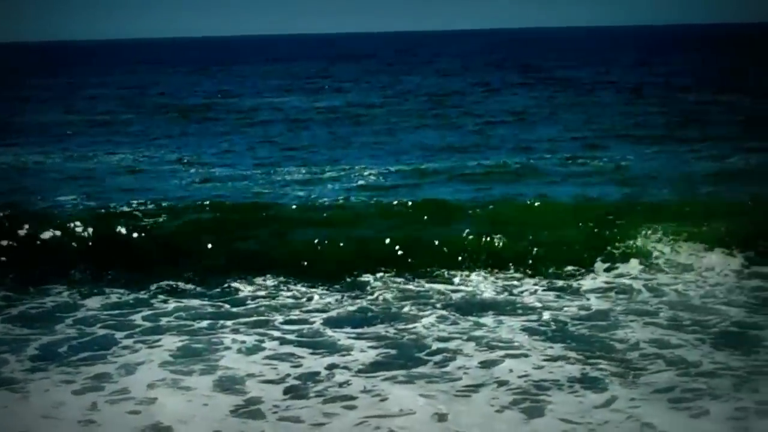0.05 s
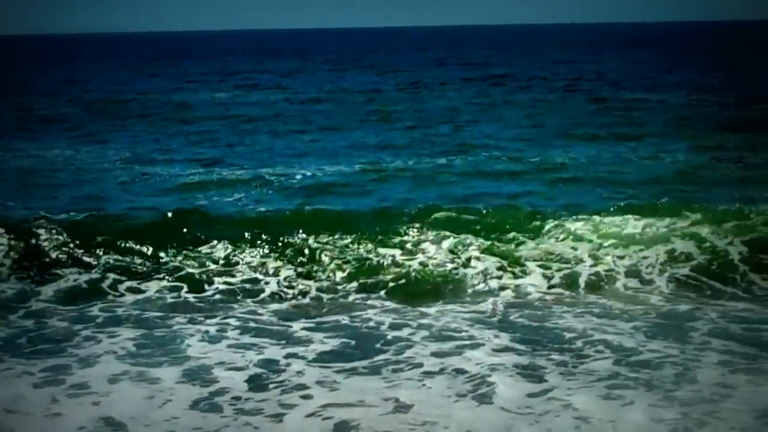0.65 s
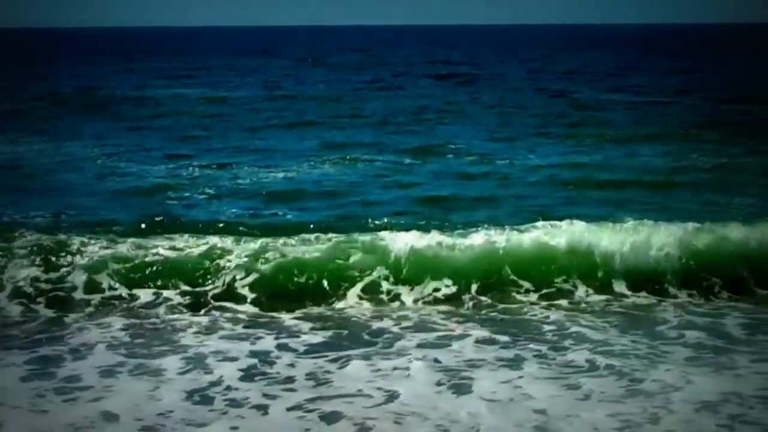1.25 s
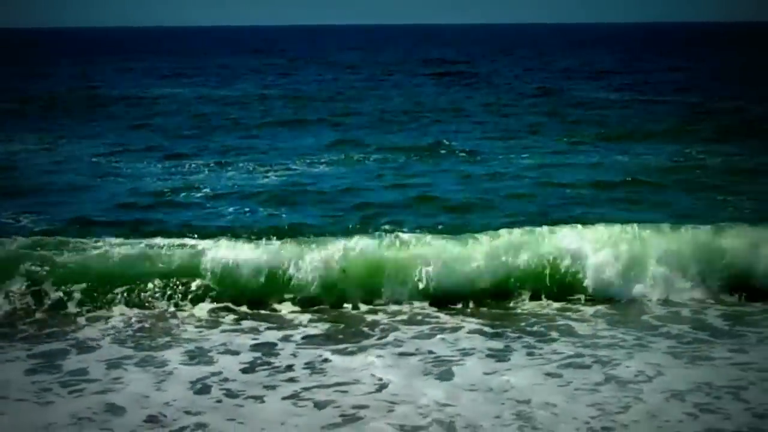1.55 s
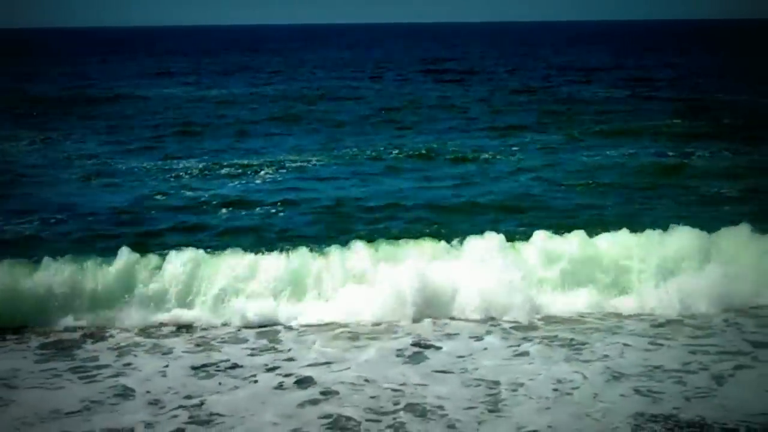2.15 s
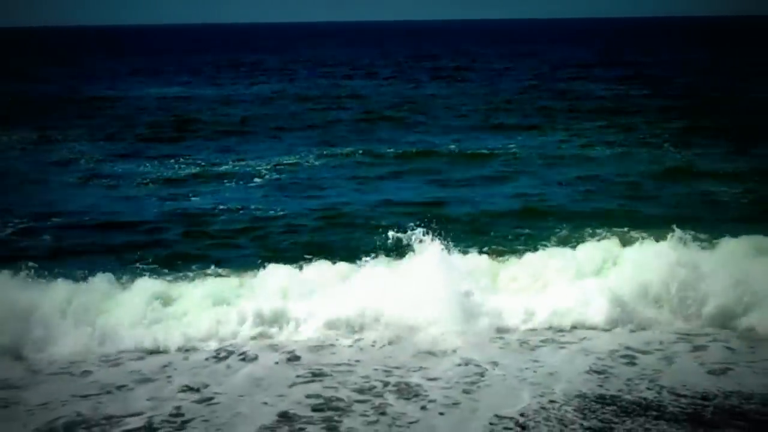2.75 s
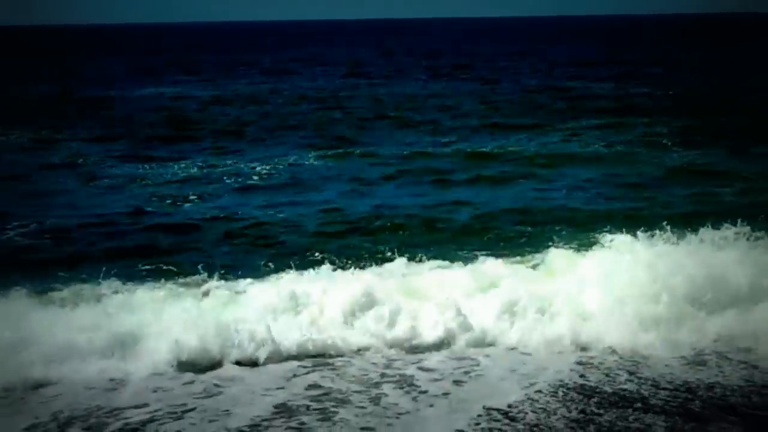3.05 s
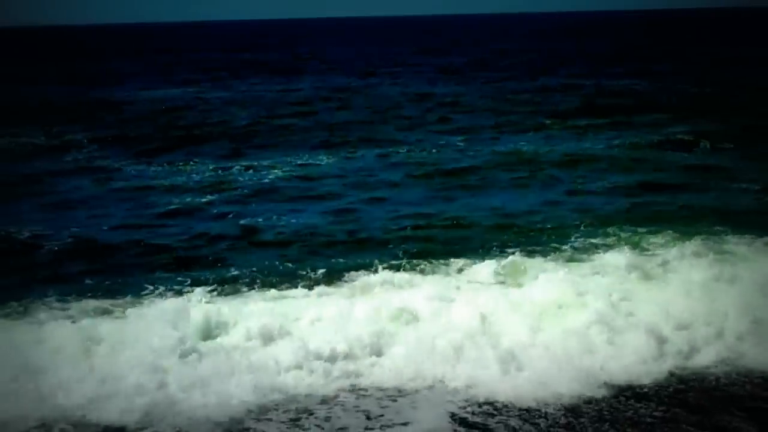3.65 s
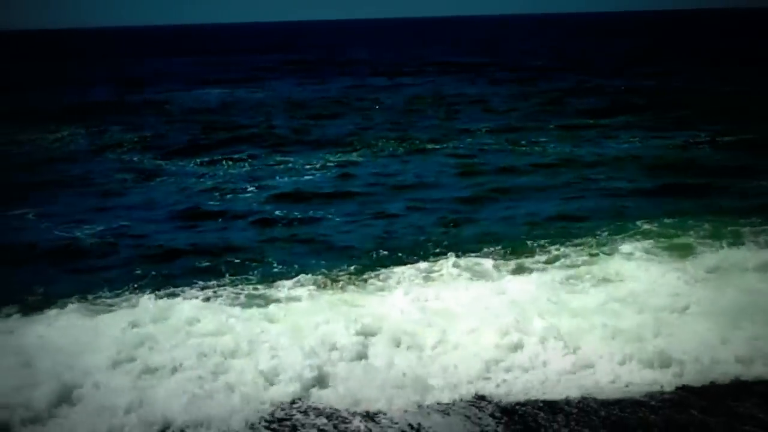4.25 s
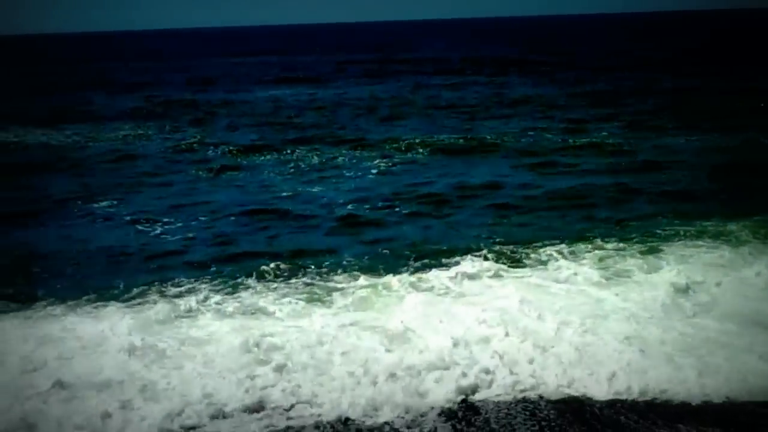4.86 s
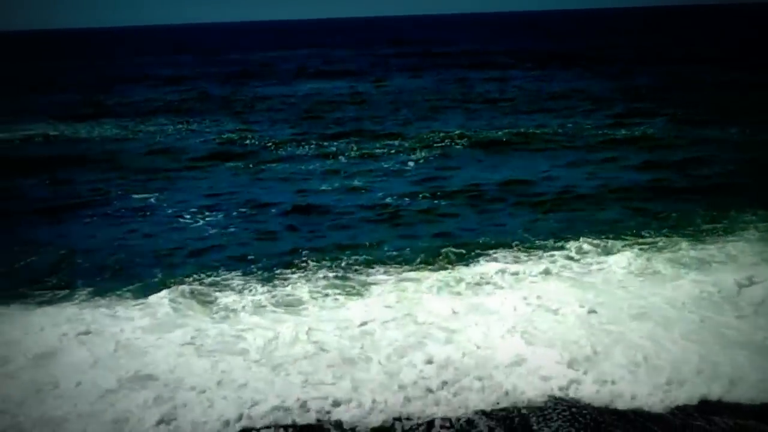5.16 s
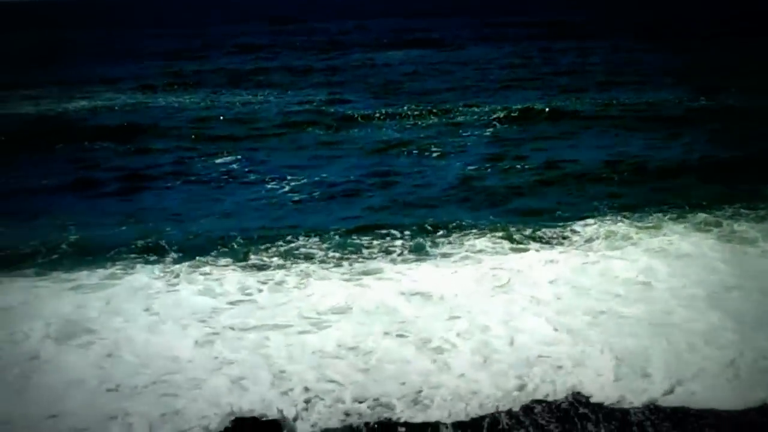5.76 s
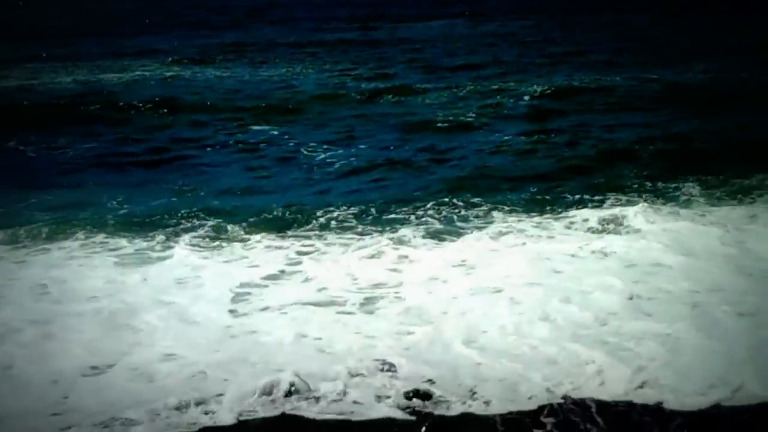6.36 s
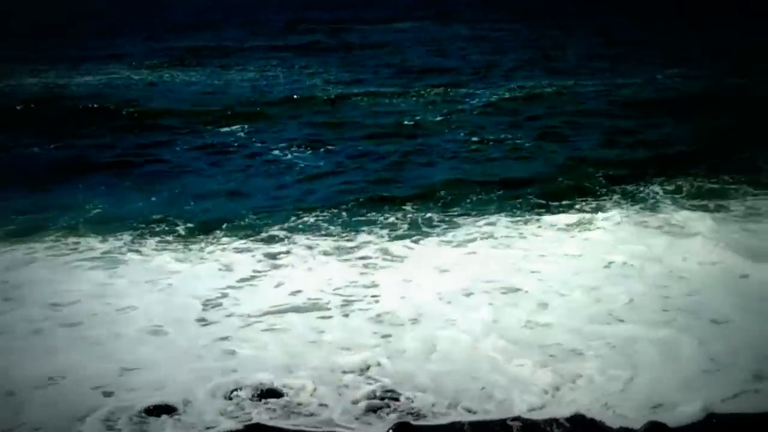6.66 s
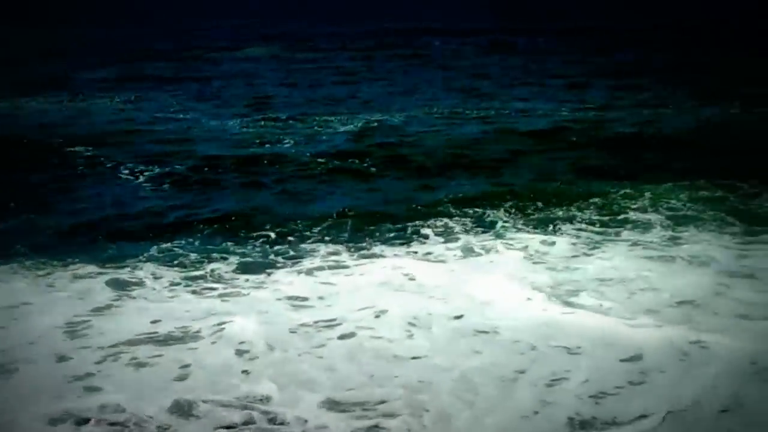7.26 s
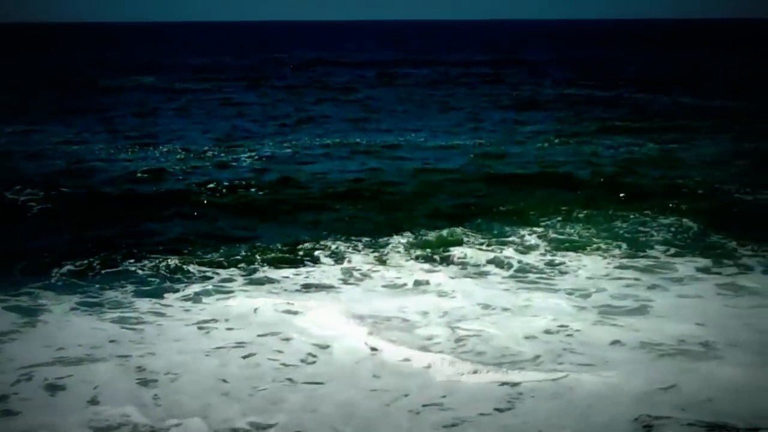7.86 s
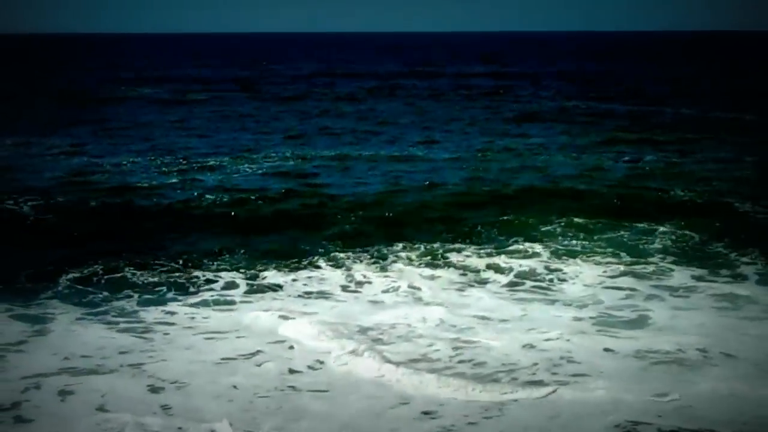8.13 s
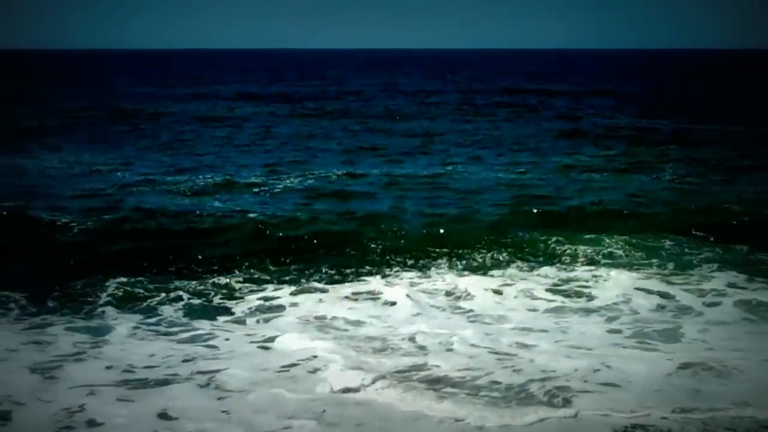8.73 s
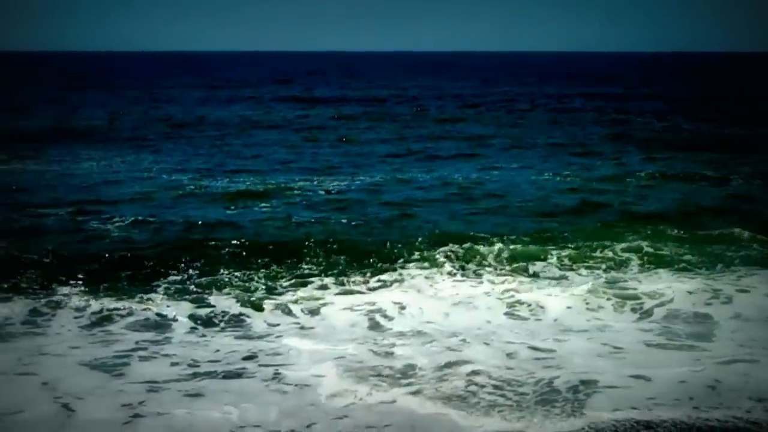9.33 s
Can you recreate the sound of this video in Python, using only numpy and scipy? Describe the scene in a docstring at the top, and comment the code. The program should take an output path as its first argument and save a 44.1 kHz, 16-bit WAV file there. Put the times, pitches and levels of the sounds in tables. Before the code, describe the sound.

Water draws back over rattling pebbles, then a wave spills and crashes with splashes, a low roar and hissing spray. The white water rushes up the stony beach, meets the bank with a dull thud and fades into fizzing foam. The backwash then swells, rolling stones that click and knock. Dull surf washes farther along the shore, and a light breeze faintly nudges the single microphone.

```python
"""A wave on a stony beach

One wave rears up, breaks and runs up the stones; then the water drains back and the next one gathers.
The bubble cloud roars, white water rushes, spray hisses and foam fizzes, each a patchy, coloured noise.
The lip lands in splashes, the bore thuds into the bank, and the backwash rolls stones that click and ring.
Dull surf washes farther along the shore, and a light breeze nudges the single microphone."""
import sys
import numpy as np
from scipy import signal
from scipy.fft import rfft, irfft, next_fast_len
from scipy.io import wavfile
from scipy.ndimage import uniform_filter1d

SR = 44100
rng = np.random.default_rng(int(sys.argv[2]) if len(sys.argv) > 2 else 0)


def unload_wav(signal):
    """Save mono or channel-first audio to the path in sys.argv[1] as 16-bit WAV at rate SR, clipped to [-1, 1]."""
    wavfile.write(
        sys.argv[1],
        SR,
        np.round(np.clip(np.atleast_2d(signal).T, -1, 1) * 32767).astype(np.int16),
    )


N = 422915
TIME = np.arange(N) / SR
# the breaker's life: its crest spills, it plunges, it has collapsed into a bore, it reaches the stones
SPILL_S, PLUNGE_S, COLLAPSE_S, BEACH_S = 1.117, 1.32, 2.17, 4.06


def gain_of(db):
    """Decibels to amplitude."""
    return 10 ** (np.asarray(db) / 20)


def unit_rms(x):
    """Scales to an rms of 1."""
    return x / np.sqrt(np.mean(x ** 2) + 1e-20)


def colour_db(colour, hz):
    """A spectrum's level at hz, interpolated on a log-frequency axis."""
    pitch_hz, level_db = np.transpose(colour)
    return np.interp(np.log(hz + 1), np.log(pitch_hz), level_db)


def add(mix, start_s, sound):
    """Mixes a sound in at start_s."""
    part = mix[max(round(start_s * SR), 0):][:len(sound)]
    part += sound[:len(part)]


def water(colour, patchy_db, patch_s, patch_hz, hop=128):
    """Countless bubbles merged into a noise that swells in patches of time and pitch."""
    frames = dict(nperseg=4 * hop, noverlap=3 * hop)
    hz, _, spectra = signal.stft(rng.standard_normal(N), SR, **frames)
    patches = rng.standard_normal(spectra.shape)
    patches = uniform_filter1d(patches, max(round(patch_hz / hz[1]), 1), axis=0)
    patches = uniform_filter1d(patches, max(round(patch_s * SR / hop), 1), axis=1)
    bubbling = signal.istft(spectra * gain_of(patchy_db * unit_rms(patches)), **frames)[1][:N]
    size = next_fast_len(N)
    eq = gain_of(colour_db(colour, np.fft.rfftfreq(size, 1 / SR)))
    return unit_rms(irfft(rfft(bubbling, size) * eq, size)[:N])


def surge(start_s, rise_s, fall_s):
    """An envelope that rises quickly and dies away."""
    age = np.maximum(TIME - start_s, 0)
    return (1 - np.exp(-age / rise_s)) * np.exp(-age / fall_s)


def backwash(layer, growth=1.0, buried_db_per_s=22):
    """A layer's envelope as each rearing wave pulls harder on the water, until its breaker buries it."""
    # waves drawing the water back: peak_s, growth_db_per_s, rush_db, roar_db, spray_db
    swells = [(1.1, 8, -35.5, -59, -44), (9.65, 5.5, -33.5, -56.5, -39)]
    level = np.zeros(N)
    for peak_s, growth_db_per_s, rush_db, roar_db, spray_db in swells:
        peak_db = {"rush": rush_db, "roar": roar_db, "spray": spray_db}[layer]
        rising_db = growth * growth_db_per_s * (TIME - peak_s)
        falling_db = buried_db_per_s * (peak_s - TIME)
        level += gain_of(peak_db + np.minimum(rising_db, falling_db))
    return level


def breaker(level_db, rise_s, sag_db_per_s, release_db_per_s, until_s=BEACH_S):
    """An envelope that builds from the spill, sags while the water rolls in, then dies away."""
    age, spent = np.maximum(TIME - SPILL_S, 0), np.maximum(TIME - until_s, 0)
    attack = 1 - np.exp(-age / rise_s)
    return attack * gain_of(level_db - sag_db_per_s * (age - spent) - release_db_per_s * spent)


def far_surf():
    """The steady, dull wash of waves farther along the shore."""
    # colour of distant surf: pitch_hz, level_db
    colour = [(20, -6), (60, -20), (130, -13.5), (260, -10), (330, -2), (480, 1), (700, -19), (1500, -24)]
    return gain_of(-58.5) * water(colour, patchy_db=-2.0, patch_s=0.073, patch_hz=200)


def breeze(rise_s=0.008, fall_s=0.096, flutter=0.32, flutter_hz=55):
    """Each puff is a slow push of pressure with a little low flutter."""
    # puffs of air on the microphone: start_s, level_db
    puffs = [(1.37, -54), (1.70, -50), (1.83, -55), (2.03, -50), (2.14, -52), (3.42, -48), (4.09, -42)]
    out, t = np.zeros(N), np.arange(SR // 2) / SR
    push = (1 - np.exp(-t / rise_s)) * np.exp(-t / fall_s)
    lowpass = signal.butter(2, flutter_hz, fs=SR, output="sos")
    for start_s, level_db in puffs:
        eddies = unit_rms(signal.sosfilt(lowpass, rng.standard_normal(len(t))))
        add(out, start_s, gain_of(level_db) * push * (1 + flutter * eddies))
    return out


def clack(hz, t60, click_db, rise_cycles=0.47, overtone_db=-9, click_s=0.0016):
    """Two stones meet: a sharp click and a short, heavily damped ring with one overtone."""
    t = np.arange(SR // 16) / SR
    ring = np.sin(2 * np.pi * hz * t) * gain_of(-60 * t / t60)
    ring += np.sin(2 * np.pi * hz * rng.uniform(1.41, 2.34) * t) * gain_of(overtone_db - 90 * t / t60)
    ring *= 1 - np.exp(-t * hz / rise_cycles)
    contact_band = signal.butter(2, [1200, 5800], "bandpass", fs=SR, output="sos")
    click = signal.sosfilt(contact_band, rng.standard_normal(len(t)) * np.exp(-t / click_s))
    return ring / abs(ring).max() + gain_of(click_db) * click / abs(click).max()


def shingle(hits_per_s=1900, spread_db=3.5, max_spreads=4.15, ring_cycles=15, bunch_db=2.5, sizes=36):
    """Pebbles of many sizes clack in little bunches as they tumble; the water muffles their clicks."""
    # the pebbles' rings, large to small: pitch_hz, level_db
    pebbles = [(350, -5.5), (550, -5), (900, 3), (1150, 1), (1500, 3), (2400, 2), (3500, -8), (5500, -6)]
    out = np.zeros(N)
    bunches = gain_of(bunch_db * np.interp(TIME, np.linspace(0, TIME[-1], 400), rng.standard_normal(400)))
    for hz in np.geomspace(pebbles[0][0], pebbles[-1][0], sizes):
        hits = rng.random(N) < bunches * hits_per_s / sizes / SR
        force = gain_of(spread_db * np.minimum(rng.exponential(1, N), max_spreads))
        stone = clack(hz, ring_cycles / hz * rng.uniform(0.89, 1.34), click_db=-19)
        out += gain_of(colour_db(pebbles, hz)) * signal.oaconvolve(hits * force, unit_rms(stone))[:N]
    low_cut = signal.butter(2, 190, "highpass", fs=SR, output="sos")  # small stones radiate no bass
    return unit_rms(signal.sosfilt(low_cut, out))


def knocks(rebound_db=-9, rebound_s=0.01):
    """Each large stone strikes, then rebounds more softly against a neighbour."""
    # large stones under the backwash: start_s, level_db, pitch_hz, t60_s, click_db (relative to the ring)
    strikes = [(0.273, -27, 2200, .006, 1), (.659, -26.5, 1370, 0.039, -12), (7.042, -36, 840, .03, -12),
               (7.18, -35, 1890, .04, -6), (7.592, -33, 1900, .035, -6), (7.74, -31.5, 880, .02, -12),
               (7.914, -25.5, 794, 0.022, -16), (7.954, -30, 960, 0.024, -2), (8.059, -32, 850, .02, -8),
               (8.077, -29, 1920, 0.027, -7), (8.165, -31.5, 860, .04, -8), (8.339, -27, 905, 0.02, -6),
               (8.573, -32, 1430, 0.025, 4), (9.084, -28, 960, .015, -6), (9.129, -27.5, 694, 0.013, -8),
               (9.237, -25, 1300, .025, -10), (9.331, -26, 750, 0.024, -12), (9.38, -28, 1420, .018, -8),
               (9.426, -24, 770, 0.016, -9), (9.528, -20, 555, 0.032, -16)]
    out = np.zeros(N)
    for start_s, level_db, hz, t60, click_db in strikes:
        add(out, start_s, gain_of(level_db) * clack(hz, t60, click_db))
        gap_s = rebound_s * rng.uniform(0.423, 1.6)
        rebound = clack(hz * rng.uniform(0.83, 1.17), t60, click_db)
        add(out, start_s + gap_s, gain_of(level_db + rebound_db) * rebound)
    return out


def foam(old_foam_db=-54):
    """The breaker leaves foam that bursts away slowly, over the faint fizz of older foam."""
    # colour of the fizz: pitch_hz, level_db
    colour = [(2000, -34), (5500, -19), (7500, -8), (9000, -5.5), (11000, -8)]
    fresh = breaker(level_db=-33.0, rise_s=0.31, sag_db_per_s=3.5, release_db_per_s=4.0)
    level = np.hypot(fresh, gain_of(old_foam_db))
    return level * water(colour, patchy_db=2.0, patch_s=0.012, patch_hz=1200)


def spray():
    """Spray flies as soon as the crest spills and keeps hissing along the bore."""
    # colour of the hiss: pitch_hz, level_db
    colour = [(800, -24.5), (2000, -7.5), (3500, 0), (5000, 0), (7000, -3), (9000, -5), (11000, -13.5)]
    burst = breaker(level_db=-34.5, rise_s=0.13, sag_db_per_s=3.5, release_db_per_s=66, until_s=COLLAPSE_S)
    bore = breaker(level_db=-31.0, rise_s=0.27, sag_db_per_s=1.71, release_db_per_s=6.5)
    level = np.sqrt(burst ** 2 + bore ** 2 + backwash("spray", growth=0.8) ** 2)
    return level * water(colour, patchy_db=1.22, patch_s=0.036, patch_hz=3520)


def splashes(rise_s=0.033):
    """The lip of the wave lands piece by piece, each with a splatter that dies away."""
    # pieces of the lip landing along the crest: start_s, level_db, fall_s
    landings = [(1.39, -29.5, .33), (1.92, -30, .12), (2.07, -35, .16)]
    # colour of the splatter: pitch_hz, level_db
    colour = [(50, -30), (110, -7.5), (350, -17), (550, 3), (1050, -6), (1400, 5), (2300, 0.5), (4000, -21),
              (11000, -26)]
    level = sum(gain_of(db) * surge(start_s, rise_s, fall_s) for start_s, db, fall_s in landings)
    return level * water(colour, patchy_db=2.0, patch_s=0.015, patch_hz=890)


def thud():
    """The bore strikes the steep bank of stones with a dull, hollow shove."""
    # colour of the impact: pitch_hz, level_db
    colour = [(80, -25), (180, -3), (380, -15), (620, 3), (900, -7), (2000, -27)]
    level = gain_of(-33.5) * surge(BEACH_S, rise_s=0.21, fall_s=0.27)
    return level * water(colour, patchy_db=2, patch_s=0.03, patch_hz=200)


def roar(earlier_db=-57.5, earlier_fade_db_per_s=6):
    """The bubble cloud grows under the breaker and is spent on the beach; an earlier one dies away."""
    # colour of the bubble cloud: pitch_hz, level_db
    colour = [(20, -33), (60, -23), (90, -14), (125, -7), (175, 1), (215, 3), (280, 0.5), (350, 0),
              (500, -9.5), (1000, -40)]
    cloud = breaker(level_db=-32.5, rise_s=1.34, sag_db_per_s=4.0, release_db_per_s=10.5)
    earlier = gain_of(earlier_db - earlier_fade_db_per_s * TIME)
    level = np.sqrt(cloud ** 2 + earlier ** 2 + backwash("roar", growth=0.56) ** 2)
    return level * water(colour, patchy_db=0.85, patch_s=0.08, patch_hz=200)


def ground_peak(x, width_hz=420, boost_db=5, start_hz=820, plunge_hz=541, climb_hz_per_s=44, sink_s=0.25):
    """A broad ground-reflection peak in the surf drops as the wave plunges and climbs as it approaches."""
    sunk = np.clip(1 + (TIME - PLUNGE_S) / sink_s, 0, 1)
    before_hz = start_hz + climb_hz_per_s * TIME
    after_hz = plunge_hz + climb_hz_per_s * (TIME - PLUNGE_S)
    centre_hz = (1 - sunk) * before_hz + sunk * after_hz
    # a gliding band-pass: shift the centre down to 0 Hz, low-pass, shift back
    carrier = np.exp(2j * np.pi * np.cumsum(centre_hz) / SR)
    pole = np.exp(-np.pi * width_hz / SR)
    baseband = signal.lfilter([(1 - pole) ** 2], [1, -2 * pole, pole * pole], x / carrier)
    band = 2 * (carrier * baseband).real
    pull = backwash("rush")
    lift_db = boost_db * (1 - pull / pull.max())  # flattens under a rearing wave
    lifted = x + (gain_of(lift_db) - 1) * band
    hold_level = np.sqrt(uniform_filter1d(x ** 2, size=16000) / uniform_filter1d(lifted ** 2, size=16000))
    return lifted * hold_level


def rush(breaker_stone_share=0.098, backwash_stone_share=0.4):
    """White water and rolling stones: the crash and the bore are mostly water, the backwash is stonier."""
    # colour of white water: pitch_hz, level_db
    colour = [(120, -41), (270, -17), (340, -11), (420, -9), (520, -2.5), (780, -3.5), (980, 0), (1130, -3),
              (1420, 0), (1850, -2), (2300, -2), (3200, -5.5), (4500, -12), (7000, -24), (11000, -31)]
    crash = breaker(level_db=-30.5, rise_s=0.34, sag_db_per_s=1.5, release_db_per_s=45, until_s=COLLAPSE_S)
    bore = breaker(level_db=-25.0, rise_s=0.29, sag_db_per_s=2.0, release_db_per_s=6.5)
    power_in, power_out = crash ** 2 + bore ** 2, backwash("rush") ** 2
    power = power_in + power_out
    stony = np.clip((breaker_stone_share * power_in + backwash_stone_share * power_out) / power, 0, 1)
    white_water = water(colour, patchy_db=1.49, patch_s=0.03, patch_hz=500)
    return np.sqrt(power) * ground_peak(np.sqrt(1 - stony) * white_water + np.sqrt(stony) * shingle())


def scene():
    """One microphone feeds both channels."""
    mono = rush() + roar() + spray() + foam() + splashes() + far_surf() + knocks() + breeze() + thud()
    return np.array([mono, mono])


def record(dry, cutoff_hz=11150):
    """A steep low-pass takes off the top treble."""
    lowpass = signal.firwin(801, cutoff_hz, window=("kaiser", 9), fs=SR)
    return signal.oaconvolve(dry, lowpass[None], "same")


dry = scene()
out = record(dry)
unload_wav(out)
```